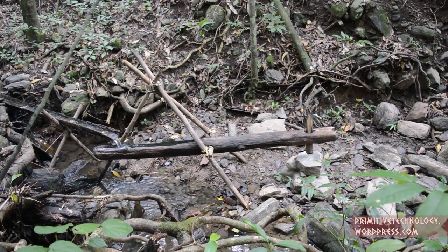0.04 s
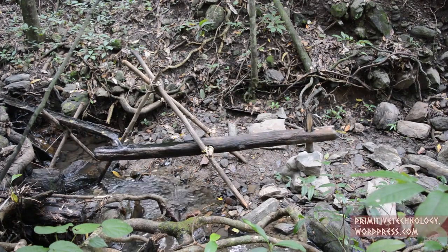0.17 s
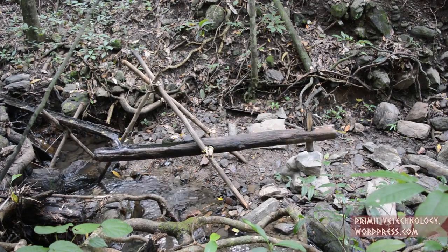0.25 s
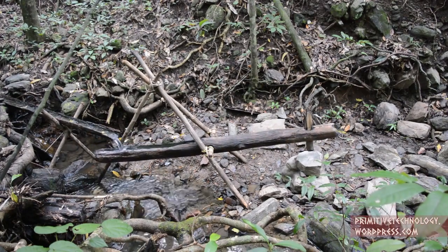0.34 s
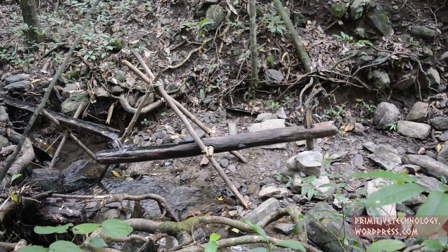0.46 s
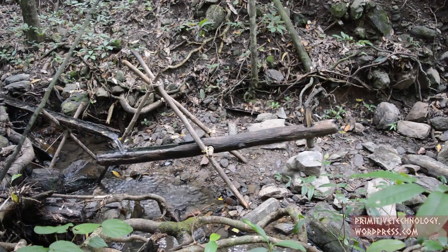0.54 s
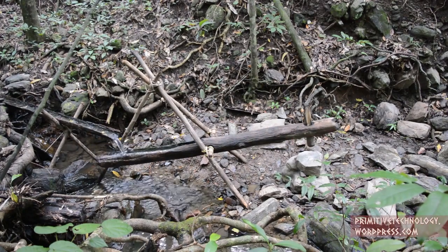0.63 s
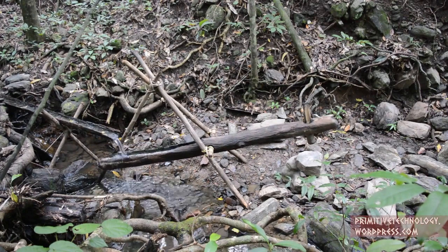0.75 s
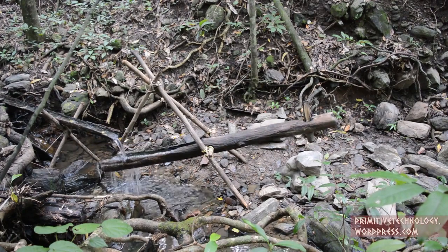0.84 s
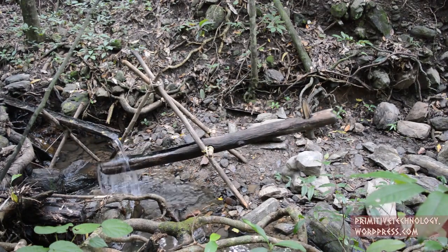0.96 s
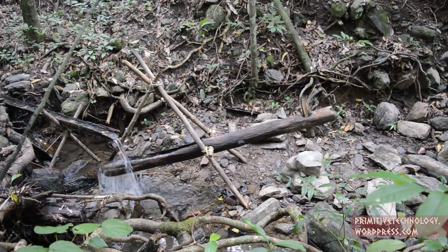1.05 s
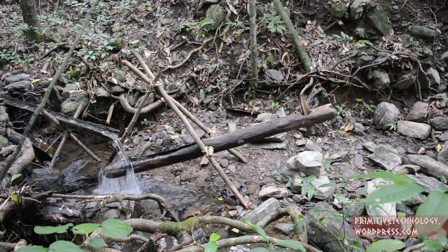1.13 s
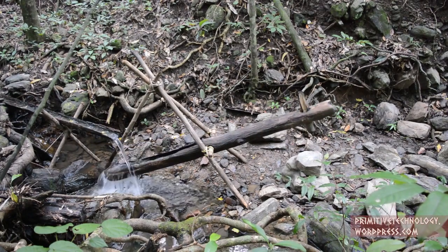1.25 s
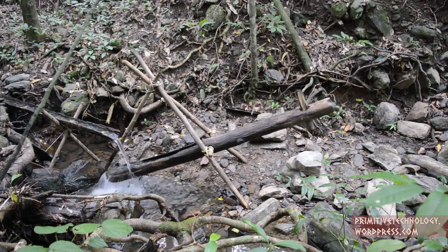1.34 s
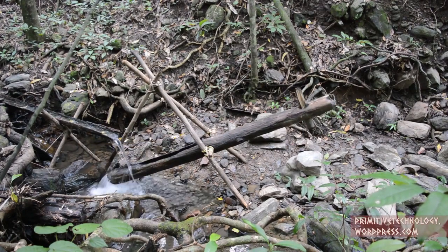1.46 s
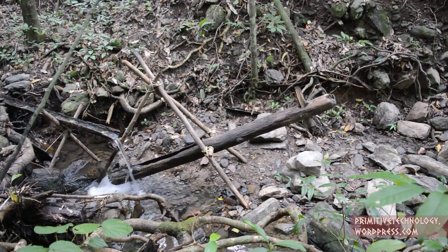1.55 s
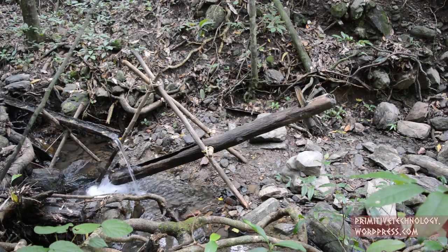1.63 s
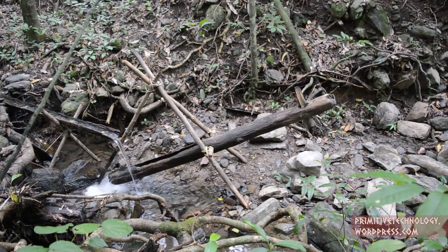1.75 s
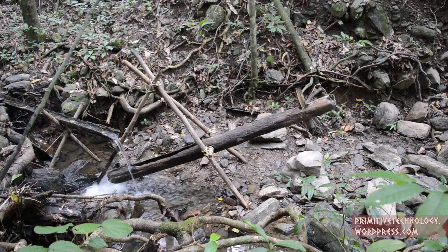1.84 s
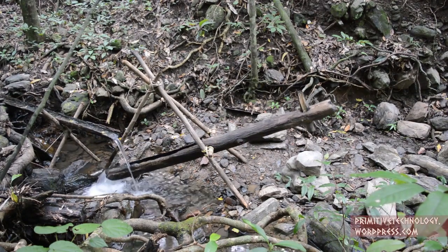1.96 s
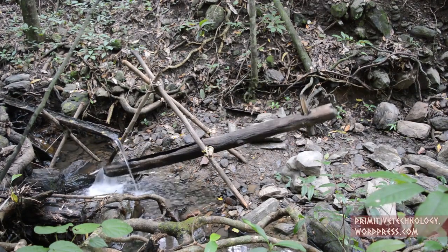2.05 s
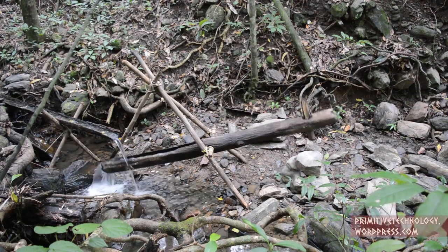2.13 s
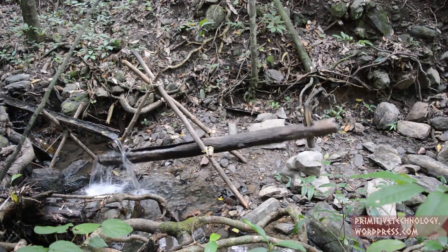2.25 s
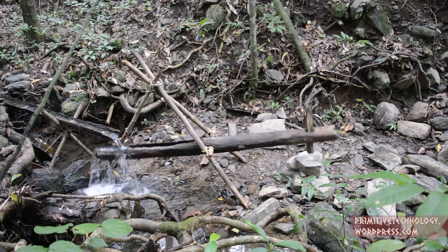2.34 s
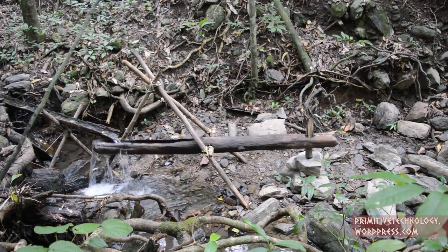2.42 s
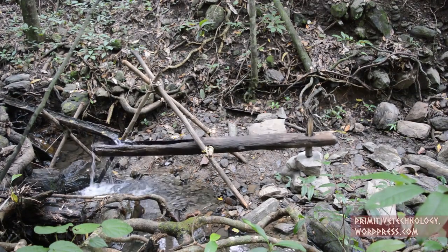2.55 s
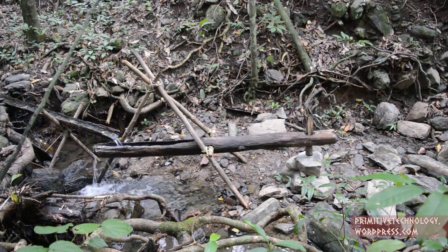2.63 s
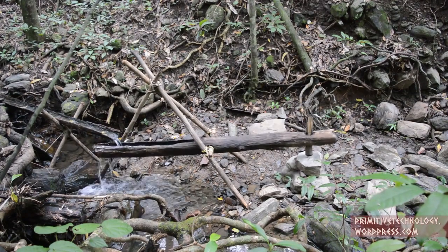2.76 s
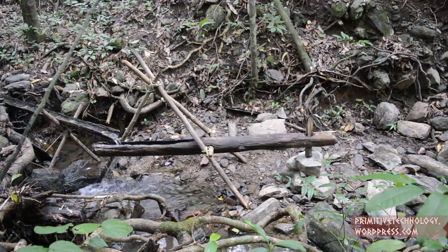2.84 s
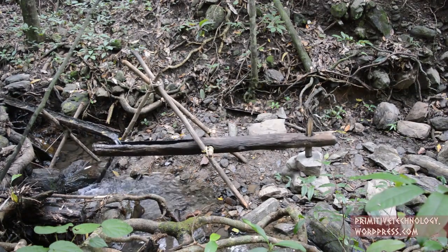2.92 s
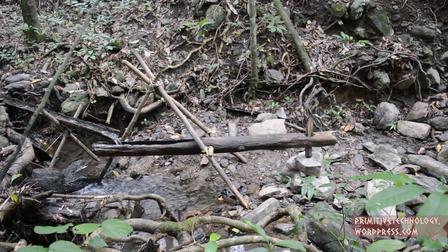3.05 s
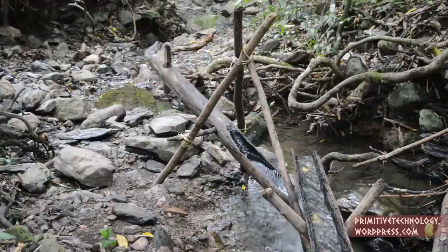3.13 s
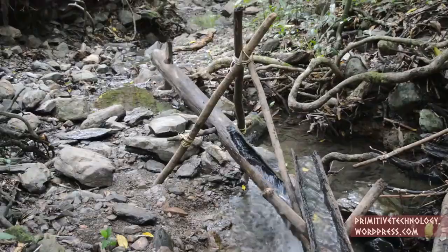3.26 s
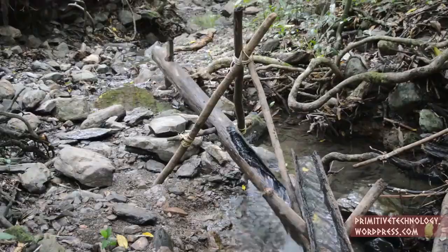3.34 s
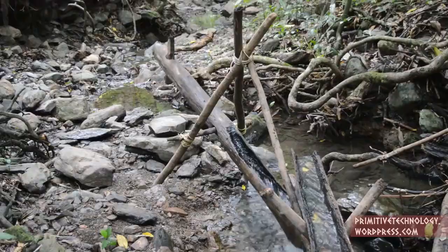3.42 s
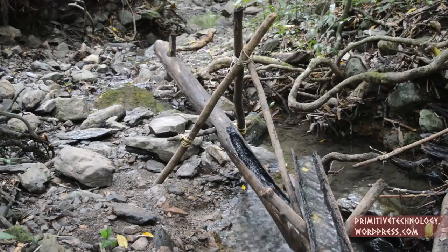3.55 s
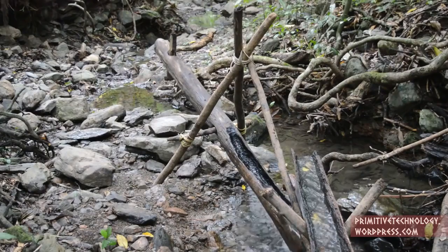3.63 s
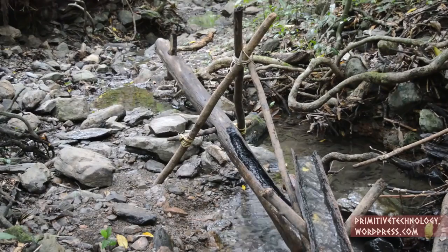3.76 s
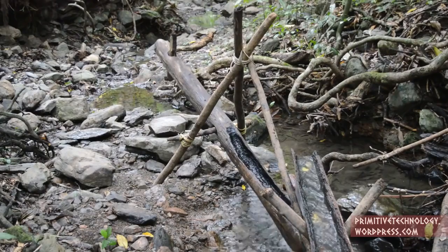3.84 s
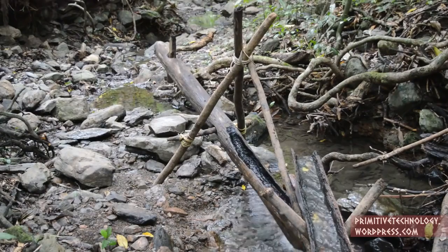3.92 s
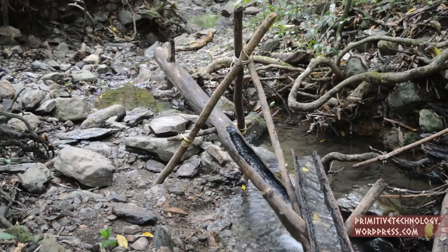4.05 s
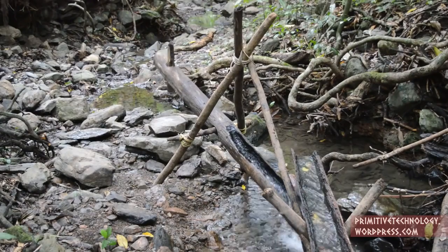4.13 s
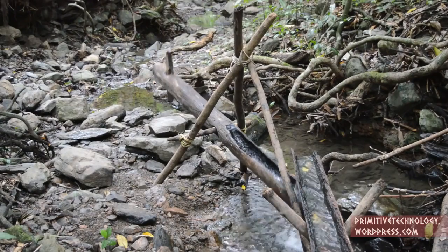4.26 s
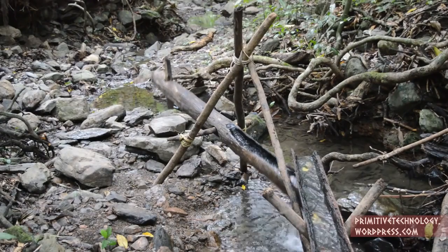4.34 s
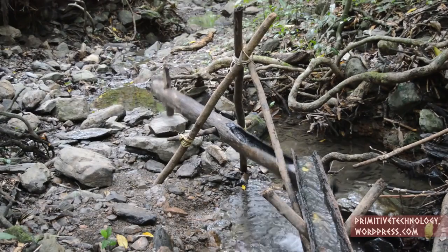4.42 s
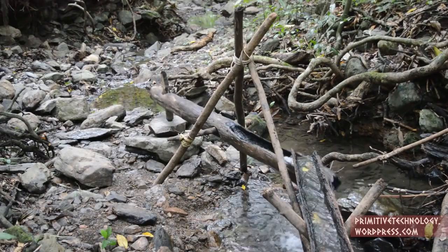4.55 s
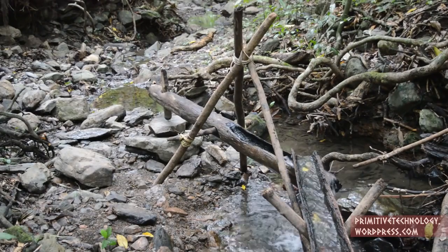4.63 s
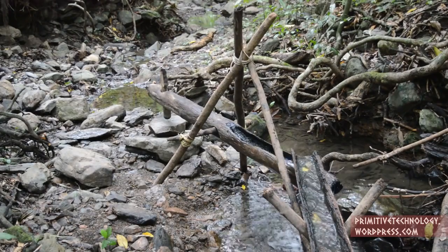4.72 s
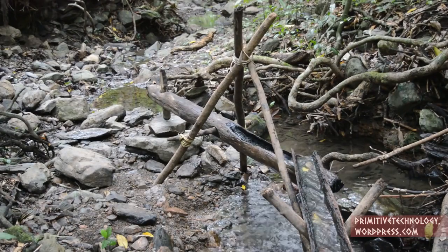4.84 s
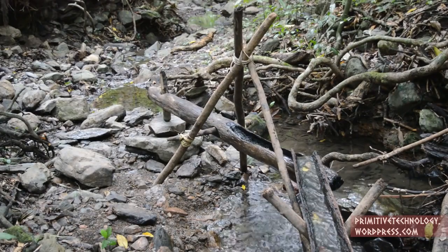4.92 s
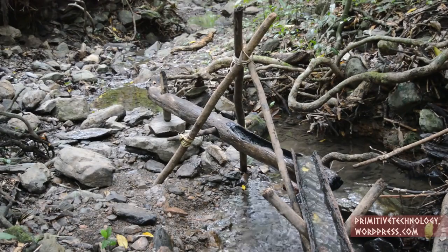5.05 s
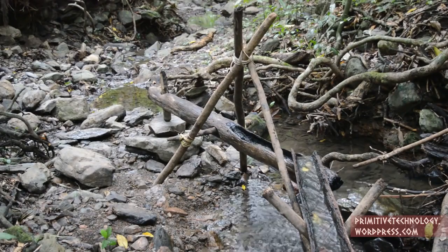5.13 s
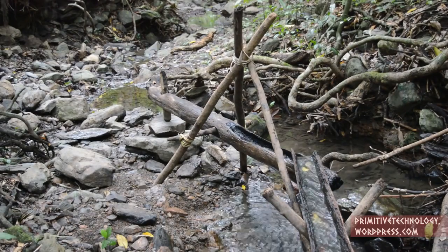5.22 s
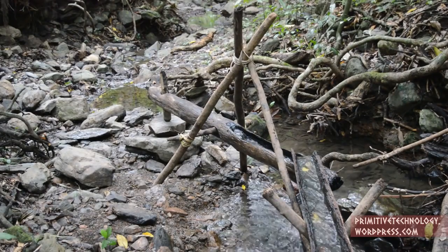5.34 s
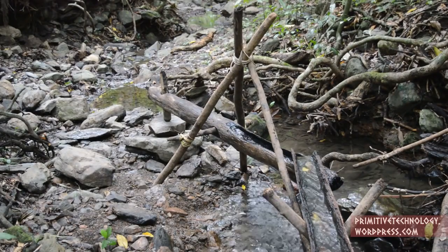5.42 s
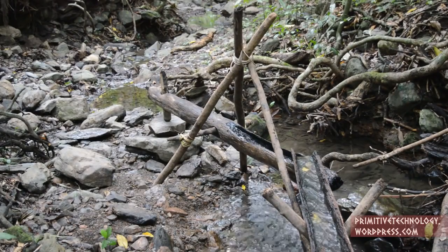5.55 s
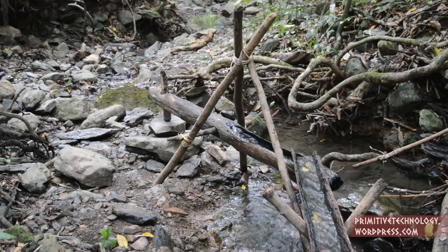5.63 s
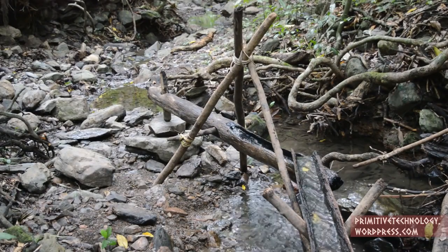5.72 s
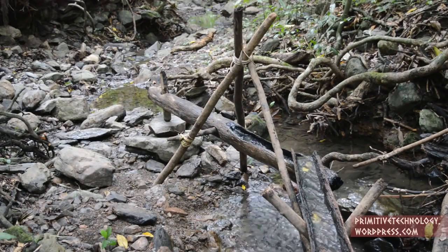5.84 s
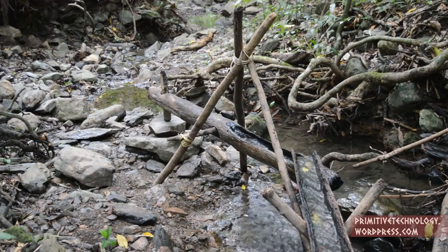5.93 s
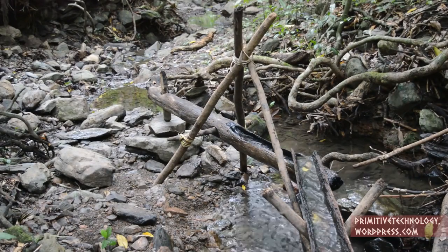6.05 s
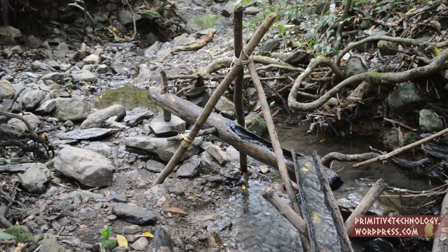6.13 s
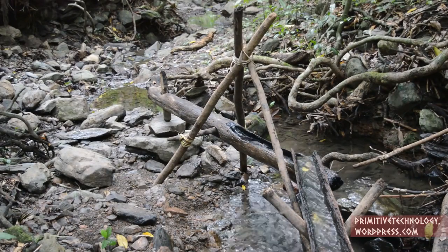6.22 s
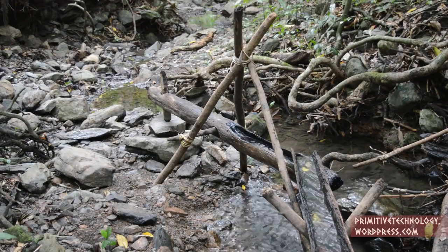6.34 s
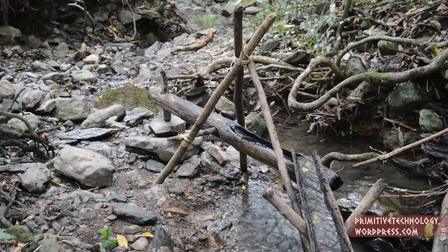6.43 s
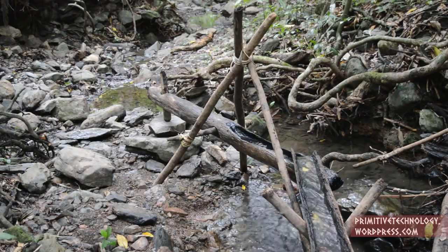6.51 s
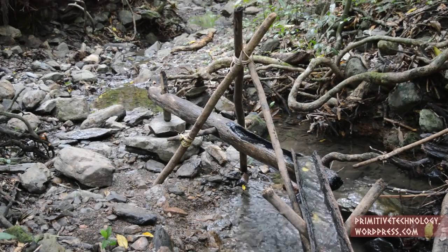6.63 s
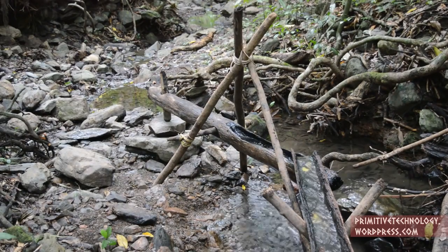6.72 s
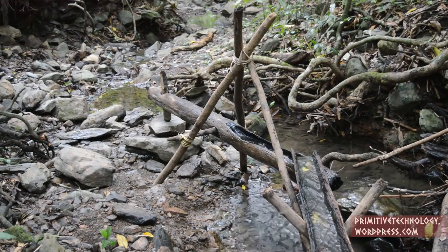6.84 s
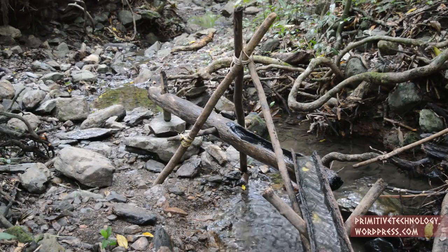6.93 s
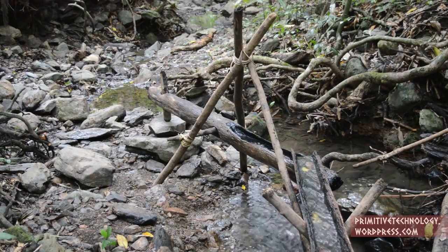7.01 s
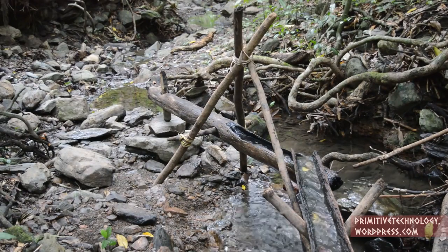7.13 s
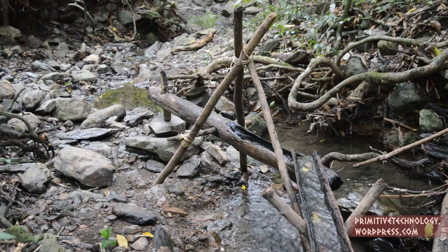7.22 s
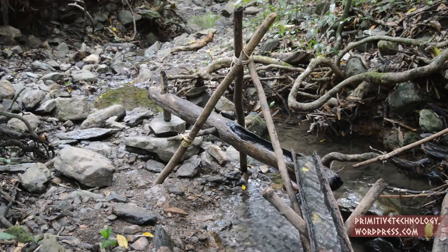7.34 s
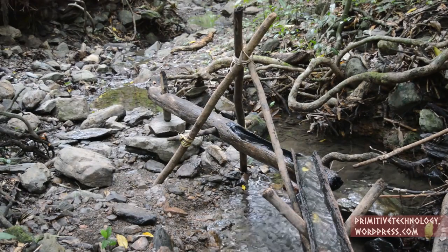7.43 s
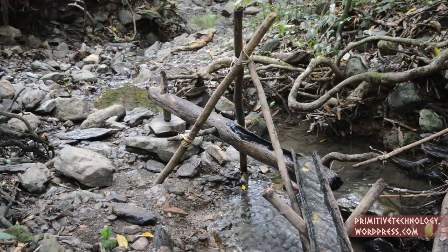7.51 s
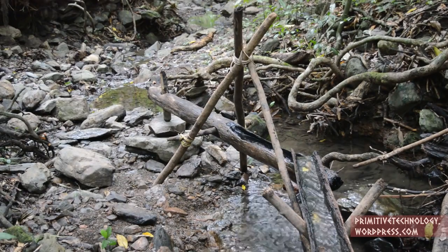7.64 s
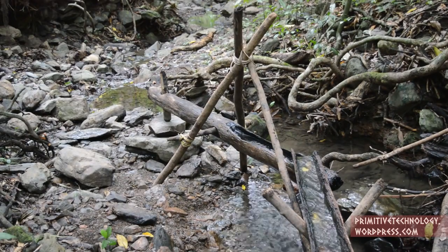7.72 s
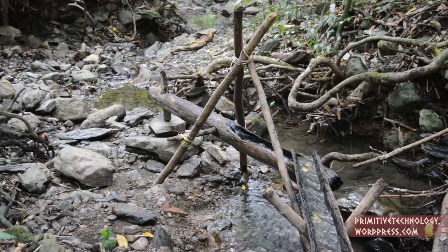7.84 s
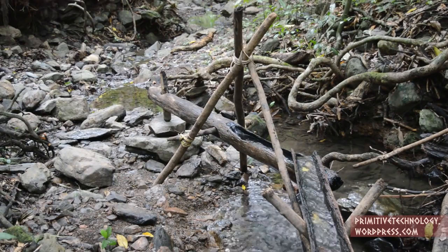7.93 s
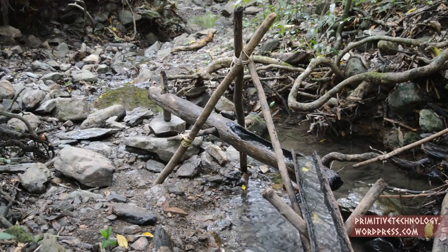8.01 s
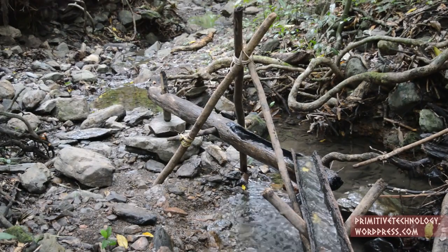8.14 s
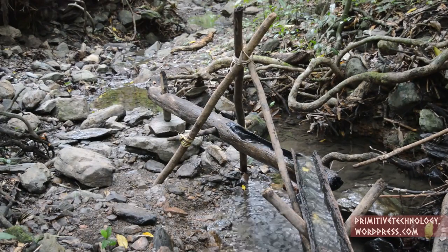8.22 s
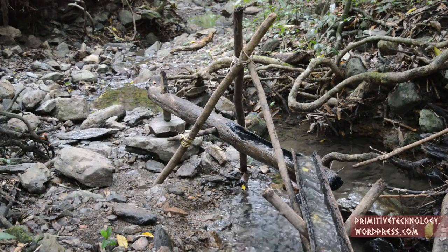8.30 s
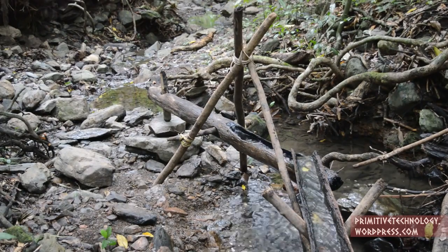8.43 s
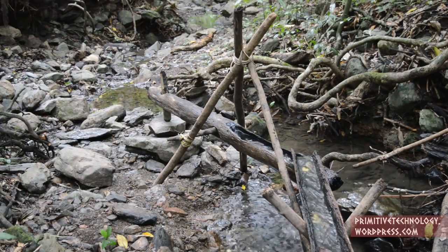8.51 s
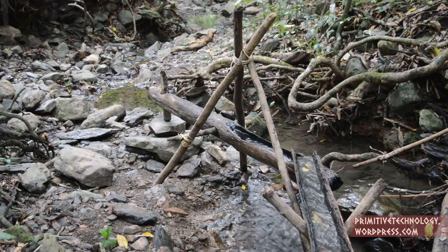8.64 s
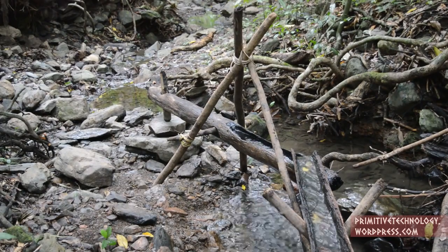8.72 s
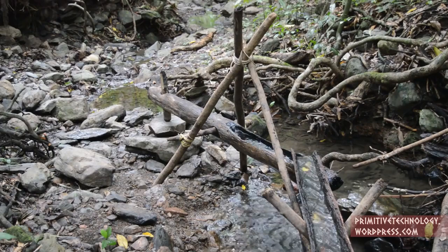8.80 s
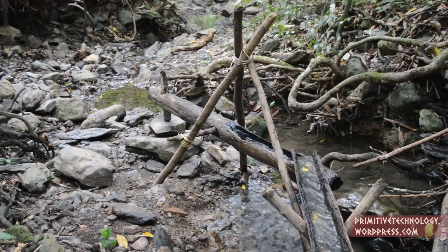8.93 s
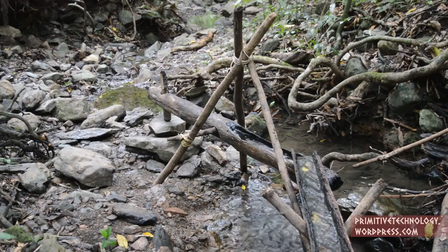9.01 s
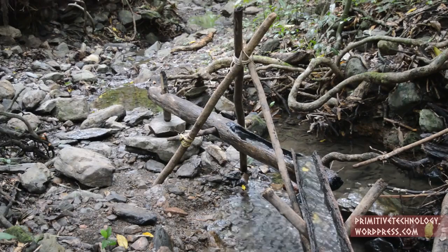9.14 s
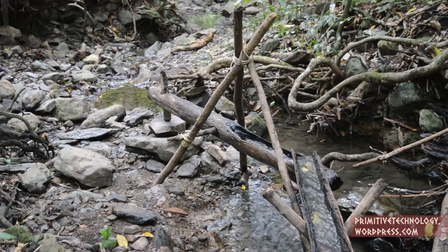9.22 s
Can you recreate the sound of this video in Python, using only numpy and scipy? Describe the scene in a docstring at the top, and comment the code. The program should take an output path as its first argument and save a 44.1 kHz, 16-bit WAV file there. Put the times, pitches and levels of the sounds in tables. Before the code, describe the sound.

In a forest creek, a pivoted log trough spills water with a splashy rush, then knocks hard on stone, twice, before quiet trickling and dripping.

```python
"""A water-driven hammer, a pivoted log, in a forest creek: over hissing, bubbling water its trough end spills
with a rush near 1.2 s, and at 2.5 s its wooden head knocks on a stone and bounces. From 3.24 s, heard from
a second place, it spills and knocks again (4.6 s); then water trickles with drips and bubbles. Far insects
buzz, loudest around 5 s. Water is noise, clicks and short ringing tones; each knock pushes many ringing
parts of the log and adds thuds and a crack. Both channels carry the same sound, as from one microphone."""
import sys
import numpy as np
from scipy import signal
from scipy.io import wavfile
from scipy.ndimage import uniform_filter1d

SR = 44100
rng = np.random.default_rng(int(sys.argv[2]) if len(sys.argv) > 2 else 0)


def digitize_waveform(pressure):
    """Quantize a signal to 16-bit integers and store it at the path in sys.argv[1].

    Rows of a 2-D input are taken as channels; values are limited to [-1, 1].
    """
    field = np.atleast_2d(pressure).T
    bounded = np.clip(field, -1, 1)
    quanta = np.round(bounded * 32767).astype(np.int16)
    wavfile.write(sys.argv[1], SR, quanta)


N = 408807
MOVE_S = 3.24   # the listener changes place
MID_FLOW_DB = -35   # middling water flow, to which churning and droplets are compared


def amp(db):
    """Turn decibels into a gain factor."""
    return 10 ** (np.asarray(db) / 20)


def rms_one(x):
    """Scale a sound to an average (rms) strength of 1."""
    return x / np.sqrt(np.mean(x ** 2) + 1e-20)


def in_time(rows):
    """Draw straight lines between the times of a table, giving one curve for each further column."""
    s, *columns = np.transpose(rows)
    return [np.interp(np.arange(N) / SR, s, column) for column in columns]


def at_hz(points, hz):
    """Read a level from a spectrum table, in between its points on a log-frequency axis."""
    table_hz, table_db = np.transpose(points)
    return np.interp(np.log(hz), np.log(table_hz), table_db)


def drift(rate_hz):
    """Wander slowly and at random around 0 with a spread of 1: smoothed noise."""
    r = np.exp(-80 * np.pi * rate_hz / SR)
    # computed at every 40th sample only; the first 2000 values let the filter settle
    slow = signal.lfilter([1], [1, -2 * r, r * r], rng.standard_normal(N // 40 + 2002))[2000:]
    return np.interp(np.arange(N) / 40, np.arange(len(slow)), rms_one(slow))


def ring(x, hz, t60):
    """Ring like a struck object: a unit click starts a sine of height 1 that falls 60 dB in t60 seconds."""
    r = amp(-60 / (t60 * SR))
    w = 2 * np.pi * hz / SR
    return signal.lfilter([0, np.sin(w)], [1, -2 * r * np.cos(w), r * r], x + 1e-18)


def band(x, hz, width_hz):
    """Keep only the frequencies around a centre."""
    edges = np.clip([hz - width_hz / 2, hz + width_hz / 2], 10, .45 * SR)
    return signal.sosfilt(signal.butter(2, edges, "band", fs=SR, output="sos"), x)


def low_pass(x, top_hz):
    """Weaken the frequencies above top_hz."""
    return signal.sosfilt(signal.butter(2, top_hz, fs=SR, output="sos"), x)


def fade(length, t60):
    """Die away steadily, by 60 dB in t60 seconds."""
    return amp(-60 * np.arange(length) / SR / t60)


def add(out, s, sound):
    """Mix a sound in at time s."""
    i = round(s * SR)
    out[i:i + len(sound)] += sound[:N - i]


def grains(per_s, spread_db):
    """Scatter clicks at random, most of them small and a few large."""
    sizes = amp(spread_db * np.minimum(rng.exponential(1, N), 5))
    return sizes * (rng.random(N) < per_s / SR)


def hiss(spectrum, centres, swell, own_db):
    """Add up third-octave bands of noise that wander by own_db; swell(k) is the gain in time of band k."""
    white = rng.standard_normal((2, N))
    total = np.zeros(N)
    for k, hz in enumerate(centres):
        gain = amp(at_hz(spectrum, hz) + own_db * drift(14)) * swell(k)
        total += gain * band(white[k % 2], hz, .23 * hz)   # neighbours use different noise
    return rms_one(total)


def swarm(spectrum, level_db, per_s, cycles, spread_db, count):
    """Clumped bubbles each ring for some cycles at one of many pitches; a higher level brings more of them."""
    crowd = amp(.8 * (level_db - level_db.min()))
    clumped_per_s = per_s * crowd * amp(3.0 * drift(8))
    clicks = grains(clumped_per_s, spread_db) * rng.choice([-1, 1], N)
    clicks /= np.sqrt(crowd)   # the crowd alone adds no power: level_db sets it below
    pitches = np.geomspace(spectrum[0][0], spectrum[-1][0], count)
    dealt = rng.integers(0, count, N)   # which pitch each click sets ringing
    rings = np.zeros(N)
    for k, hz in enumerate(pitches):
        tone = rms_one(ring(clicks * (dealt == k), hz, cycles / hz))
        rings += amp(at_hz(spectrum, hz)) * np.sqrt(hz) * tone
    return amp(level_db) * rms_one(rings)


def creek():
    """The creek further off is steady noise over a wide range of pitch."""
    # colour of the creek: (frequency [Hz], relative level per Hz [dB])
    creek_spectrum = [(25, -7.5), (70, 6), (130, -0.5), (400, -2), (1000, -6), (2000, -9), (3500, -13),
                      (6500, -26), (10000, -27), (16000, -22)]
    centres = 25 * 2 ** (np.arange(29) / 3)
    return amp(-53.5) * hiss(creek_spectrum, centres, lambda k: 1, own_db=.8)


def water_flow():
    """The strength of the falling water in dB, moment by moment, is its level as heard in the spray."""
    # level of the falling water: (time [s], level [dB])
    flow = [(0, -45), (.5, -40), (.8, -39.5), (.95, -35), (1.08, -26), (1.37, -25), (1.57, -28),
            (2.22, -33), (2.5, -30.5), (2.66, -34), (3.12, -37.5), (3.24, -40.5), (3.4, -27.5), (3.55, -28),
            (3.95, -33), (4.31, -34.5), (4.55, -31.5), (4.72, -34), (5.5, -44), (9.27, -45.5)]
    return in_time(flow)[0]


def splashes(per_s, spread_db, t60):
    """Power of random drops, each starting at once and dying away, kept near 1 over each second."""
    power = signal.lfilter([1], [1, -amp(-120 / (t60 * SR))], grains(per_s, spread_db) ** 2 + 1e-18)
    return power / (uniform_filter1d(power, SR) + 1e-9)


def spray(level_db, smooth=0.61, wide=0.063):
    """Fine spray is smooth noise; bigger drops burst over all or part of the treble, more often in strong flow."""
    # colour of the spray: (frequency [Hz], relative level per Hz [dB])
    spray_spectrum = [(1800, -3.5), (2200, -2), (3000, -0.5), (4000, -3.5), (6100, 2), (8800, -8.5),
                      (12000, -21), (16000, -43)]
    busy = amp(.3 * (level_db + 45))
    everywhere = splashes(30 * busy, 0.62, 0.028)
    parts = [splashes(60 * busy, 2.2, 0.05) for _ in range(4)]
    # smooth and wide are shares of the power; the rest belongs to the four parts
    gains = [np.sqrt(smooth + wide * everywhere + (1 - smooth - wide) * part) for part in parts]
    # the second place is 3 dB duller above about 8 kHz
    gains[3] = gains[3] * np.where(np.arange(N) > MOVE_S * SR, amp(-3), 1)
    centres = 1800 * 2 ** (np.arange(10) / 3)
    noise = hiss(spray_spectrum, centres, lambda k: gains[min(k * 3 // 7, 3)], own_db=1.0)
    return amp(level_db) * noise


def churning(spray_db):
    """Churning bubbles ring in a crowd that follows the flow with a lag and is nearer at the second place."""
    # colour of the churning: (frequency [Hz], relative level per Hz [dB])
    churn_spectrum = [(450, -16), (870, -8), (1270, -5), (1700, -7.5), (2300, -25)]
    lag_s = 0.052
    mid_db, db_per_flow_db, nearer_db = -43.5, 1.2, 4   # mid_db: level at middling flow, first place
    r = np.exp(-1 / (lag_s * SR))
    lagged_db = signal.lfilter([1 - r], [1, -r], spray_db - spray_db[0]) + spray_db[0]
    level_db = mid_db + db_per_flow_db * (lagged_db - MID_FLOW_DB)
    level_db += nearer_db * (np.arange(N) > MOVE_S * SR)
    return swarm(churn_spectrum, level_db, per_s=300, cycles=46.0, spread_db=2.0, count=24)


def gulping():
    """Low bubbles gulp in a crowd that swells around each spill and settles slowly."""
    # colour of the gulps: (frequency [Hz], relative level per Hz [dB])
    gulp_spectrum = [(120, -13), (190, 2.5), (270, -3), (340, 3), (550, -9)]
    # each spill stirs the pool: (time of strongest gulping [s], level [dB])
    stirs = [(1.55, -42.5), (3.58, -42.5)]
    rise_db_per_s, fall_db_per_s, calm_db = 65, 12, -61.5
    t = np.arange(N) / SR
    swells = [db - np.maximum(rise_db_per_s * (s - t), fall_db_per_s * (t - s)) for s, db in stirs]
    level_db = np.maximum(calm_db, np.max(swells, axis=0))
    return swarm(gulp_spectrum, level_db, per_s=80, cycles=14, spread_db=1.5, count=12)


def smack(hz, t60, noise):
    """A drop gives a sharp tick, a short noise burst around its pitch and a broader splash; peak 1."""
    length = noise.shape[1]
    tick = band(noise[1] * fade(length, 0.0055), 1.13 * hz, 0.98 * hz)
    core = band(noise[0] * fade(length, t60), hz, 0.22 * hz)
    splash = band(noise[1] * fade(length, 0.21), 5600, 5300)
    drop = amp(-4.0) * tick + core + amp(-16) * splash
    return drop / np.abs(drop).max()


def smacks(spray_db, count):
    """Clear drops smack on wood, stone or water, among random droplets whose loudness follows the spray."""
    # the clearest drops: (time [s], peak level before the treble cut [dB], centre frequency [Hz])
    clear_drops = [(0.03, -32, 4370), (0.1131, -28, 4500), (0.2029, -30, 4330), (0.2957, -29, 6930),
                   (0.387, -20, 3460), (0.4189, -23, 4390), (0.4454, -25, 3370), (0.5073, -22, 3230),
                   (0.5742, -25, 5440), (0.5945, -36, 4400), (0.6977, -27, 3000), (0.9273, -19.5, 5500),
                   (1.0068, -16, 2870), (1.0475, -17, 2730), (1.1373, -13, 5900), (1.216, -9, 6060),
                   (2.3501, -17, 6200), (2.7496, -17, 6350), (2.8052, -18, 6200), (2.919, -16.5, 5800),
                   (3.025, -14, 5800), (3.1774, -18, 4140), (3.5868, -10, 3300), (5.0414, -13.5, 6000),
                   (5.0856, -17, 5530), (5.145, -20.5, 3900), (5.2917, -22, 5760), (5.478, -23.5, 3000),
                   (5.5566, -17, 4050), (5.9314, -26, 4730), (6.2694, -27.5, 2810), (6.5733, -16.5, 4060),
                   (6.7403, -23, 5700), (6.977, -25, 6130), (7.0638, -25.5, 5950), (7.1427, -20, 6000),
                   (7.1624, -25, 3470), (7.5832, -17.5, 6400), (7.9106, -26, 7010), (8.433, -28, 3300),
                   (8.5021, -27, 5550), (8.7145, -24.5, 5990)]
    db_per_flow_db = 0.83
    out, length = np.zeros(N), SR // 8
    for s, db, hz in clear_drops:
        add(out, s, amp(db) * smack(hz, 0.034, rng.standard_normal((2, length))))
    for when, size, loud in rng.random((count, 3)):
        level_db = MID_FLOW_DB + db_per_flow_db * (spray_db[int(when * N)] - MID_FLOW_DB)
        level_db += 5.0 + 11 * loud - 7 * size ** 2   # high-pitched droplets are fainter
        droplet = smack(2600 * 3.98 ** size, 0.011, rng.standard_normal((2, length)))
        add(out, when * N / SR, amp(level_db) * droplet)
    return low_pass(out, 9700)


def bubble(hz, t60, rise, plop):
    """A dying sine glides in pitch while its loudness wobbles at random; the drop lands with a brief plop."""
    t = np.arange(len(plop)) / SR
    # rise is the glide per second as a share of hz; hz itself is reached early on
    turns = hz * (t + rise * (t ** 2 - t * t60 * .3) / 2)
    loudness = np.abs(plop)
    wobble = 1 + .9 * uniform_filter1d(loudness - loudness.mean(), size=200) * 4
    soft_start = 1 - np.exp(-t * hz / 1.0)
    swing = wobble * np.sin(2 * np.pi * turns) * fade(len(t), max(t60, .01)) * soft_start
    return swing + amp(-4) * plop * fade(len(t), 0.009)


def bubbles(count):
    """Trapped air rings: the clearest bubbles, and many fainter random ones in clusters of four."""
    # from big air pockets in the pool to small ones under drips: (time [s], approximate peak [dB], pitch [Hz])
    clear_bubbles = [(0.35, -36, 700), (0.371, -29.5, 1200), (0.419, -29, 1810), (0.422, -35, 894),
                     (0.455, -25.5, 1190), (0.526, -32, 1850), (0.556, -27, 1600), (0.603, -31, 1880),
                     (0.804, -34, 1155), (1.075, -30.5, 798), (1.185, -26.5, 1150), (1.336, -34, 415),
                     (1.404, -31, 363), (1.541, -36, 380), (1.583, -29, 196), (2.74, -28.5, 961),
                     (2.875, -32, 1390), (3.018, -32.5, 825), (3.075, -29, 842), (3.141, -35, 612),
                     (3.614, -32, 204), (3.659, -27.5, 189), (3.827, -34, 205), (4.003, -37, 190),
                     (4.202, -32.5, 477), (4.533, -28.5, 1480), (5.085, -26.5, 845), (5.111, -26, 1190),
                     (5.16, -27.5, 800), (5.199, -31, 1183), (5.294, -32, 1056), (5.351, -29.5, 1370),
                     (5.478, -31, 1550), (5.493, -28.5, 1145), (5.61, -35.5, 1096), (5.753, -34, 1410),
                     (5.772, -27, 1430), (5.785, -38, 860), (5.831, -43, 854), (6.04, -41, 796),
                     (6.13, -39, 1370), (6.151, -42, 760), (6.192, -35, 1003), (6.436, -32, 1570),
                     (6.489, -33.5, 1430), (6.613, -35, 1830), (6.893, -39.5, 1110), (6.98, -38, 1820),
                     (7.055, -31.5, 1515), (7.464, -28, 927), (7.743, -36, 1410), (7.773, -35.5, 982),
                     (7.803, -36.5, 740), (8.099, -30.5, 1050), (8.153, -35, 620), (8.185, -31, 1235),
                     (8.22, -34, 2130), (8.298, -34, 1460), (8.321, -34, 840), (8.383, -36, 973),
                     (8.405, -38, 742), (8.403, -34, 1080), (8.435, -31.5, 1440), (8.574, -31.5, 996),
                     (8.622, -36.5, 670), (8.904, -33, 1670), (9.002, -33, 1216), (9.067, -35.5, 1030)]
    t60_at_1khz = 0.0866   # seconds; big, low bubbles ring longer
    rise_per_s = 3.5   # mean upward glide as a share of the pitch, from 1 kHz up; lower ones glide less
    out, length = np.zeros(N), SR // 5
    plops = rms_one(band(rng.standard_normal((len(clear_bubbles), length)), 1820, 2400))
    trails = rng.random((len(clear_bubbles), 3, 3))
    for (s, db, hz), plop, trail in zip(clear_bubbles, plops, trails):
        khz = hz / 1000
        rise = rise_per_s * min(khz, 1) * 4 * trail[0, 0] ** 3   # a random few glide much more than the rest
        sound = bubble(hz, t60_at_1khz / np.sqrt(khz), rise, plop * min(khz, 1) ** 2)
        add(out, s, amp(db) * sound)
        for late, size, glide in trail[1:]:   # bubbles, mostly smaller, break away after it
            small_hz = hz * (0.95 + 0.716 * size)
            small = bubble(small_hz, 55 / small_hz, 14 * glide, 0 * plop)
            add(out, s + .015 + .05 * late, amp(db - 11) * small)
    for k, (when, *draws) in enumerate(rng.random((count, 17))):
        for late, size, loud, glide in np.reshape(draws, (4, 4)):
            hz = 700 * 2.8 ** size
            sound = bubble(hz, 60 / hz, 20 * glide ** 2 - 3, plops[k % len(plops)])
            add(out, when * (N / SR - .1) + .08 * late, amp(-53 + 10.7 * loud) * sound)
    return out


def contacts():
    """Every fall is followed by quick rebounds and one late soft bounce: (s, six part levels dB, contact ms)."""
    # the head falls on the stone: (time [s], late bounce after it [s], strength of rebounds [dB], of bounce [dB],
    # then as heard from each place: bending, trough, beam, head, crack, ground thump [dB])
    falls = [(2.5156, .4384, -1.5, -2, -29, -21.5, -15.5, 1, 1, -7),
             (4.5707, .4529, 0.5, -1, -18.5, -12, -11, 0.5, -8.5, -13)]
    # quick rebounds: (time after the fall [s], then relative to the fall:
    # bending, trough, beam, head, crack, thump [dB]; contact [ms])
    rebounds = [(0.0712, 4.5, -2, -10, -17, -45, -8.5, 0.39), (.088, -41, -1.5, -19, -19.5, -45, -20, 0.59),
                (.119, -3, -14, -21.5, -22, -49, -23, .25)]
    # late soft bounce, relative to the fall: (bending, trough, beam, head, crack, thump [dB]; contact [ms])
    *bounce_parts_db, bounce_ms = (-8, -2.5, -5.5, -22, -37, -6, 1.54)
    fall_ms = .22
    rows = []
    for s, bounce_s, rebound_db, bounce_db, *parts_db in falls:
        rows.append((s, *parts_db, fall_ms))
        rows.append((s + bounce_s, *(np.add(parts_db, bounce_parts_db) + bounce_db), bounce_ms))
        for late, *less_db, ms in rebounds:
            rows.append((s + late, *(np.add(parts_db, less_db) + rebound_db), ms))
    return sorted(rows)


def ring_modes(push, modes):
    """Let one push ring a list of (dB, Hz, t60) modes, neighbours swinging in opposite sense."""
    return sum((-1) ** k * amp(db) * ring(push, hz, t60) for k, (db, hz, t60) in enumerate(modes))


def hammer():
    """Each contact smoothly pushes the modes of every part, plus a thump, a noisy thud and a wood-on-stone crack."""
    # ringing modes of each part of the log: (frequency [Hz], relative level [dB], 60 dB decay time [s])
    bending = [(80, -13, 0.24), (205, -2, 0.67)]
    trough = [(382, -2.5, 0.17), (417, -2.9, 0.12)]
    beam = [(527, 2.4, .22)]
    head = [(757, -8.5, 0.056), (906, 4, 0.034), (1000, 5.5, 0.0089), (1116, -8, 0.074),
            (1265, -7.5, 0.055), (1670, -13.5, 0.032), (2420, -30, .025)]
    # dull noise of fibres, lashings and ground: (frequency [Hz], level relative to the head [dB], decay time [s])
    thud = [(135, -28, 0.066), (322, -18.5, 0.078), (705, -16, 0.21), (1030, -16.5, 0.12),
            (1680, -4.5, 0.018)]
    # stone resonances: (frequency [Hz], width [Hz], relative level [dB])
    stone = [(1760, 2700, -16), (3380, 280, 1), (5700, 2800, -2), (7960, 1900, -8.5), (12500, 3700, -17)]
    pressed_t60_s = .045   # each new contact stops what trough, beam and head still ring with
    out, length, rows = np.zeros(N), SR, contacts()
    t = np.arange(length) / SR
    next_times = [row[0] for row in rows[1:]] + [np.inf]
    for row, then in zip(rows, next_times):
        s, bending_db, trough_db, beam_db, head_db, crack_db, thump_db, contact_ms = row
        push = np.zeros(length)
        shape = np.hanning(round(contact_ms * SR / 500))   # contact_ms is its width at half height
        push[:len(shape)] = -shape / shape.sum()
        parts = [(trough_db, trough), (beam_db, beam), (head_db, head)]
        struck = [(part_db + db, hz, t60) for part_db, modes in parts for hz, db, t60 in modes]
        wood = ring_modes(push, struck)
        wood *= amp(-60 * np.maximum(t - (then - s), 0) / pressed_t60_s)
        wood += ring_modes(push, [(bending_db + db, hz, t60) for hz, db, t60 in bending])
        noise = rng.standard_normal((2, length))
        for hz, db, t60 in thud:
            wood += amp(head_db + db) * rms_one(band(noise[0], hz, 0.38 * hz)) * fade(length, t60)
        wood *= 1 - np.exp(-t / 0.0019)   # the blow needs a moment to spread through the log
        wood += amp(thump_db) * ring(push, 190, 0.018)
        crack = sum(amp(db) * band(noise[1], hz, width) for hz, width, db in stone)
        if s > MOVE_S:
            crack = low_pass(crack, 8500)   # duller at the second place
        add(out, s, wood)
        add(out, s + .0011, amp(crack_db) * rms_one(crack) * fade(length, 0.016))
    return out


def scatter(x):
    """Rocks and trunks return diffuse echoes: a noise tail with its own decay in each band."""
    # echoes: (frequency [Hz], level [dB], 60 dB decay time [s])
    echoes = [(2000, -59, 0.07), (3470, -46, 0.11), (7040, -46, 0.14)]
    length = SR // 2
    tail = np.zeros(length)
    for hz, db, t60 in echoes:
        noise = band(rng.standard_normal(length), hz, 0.77 * hz)
        tail += amp(db) * rms_one(noise) * fade(length, t60)
    delay = np.zeros(round(0.0037 * SR))
    return signal.fftconvolve(x, np.concatenate([delay, tail]))[:N]


def insects():
    """Many far insects blur into narrow bands of noise that throb a little."""
    # chorus levels: (time [s], low band level [dB], high band level [dB])
    chorus = [(0, -78, -63), (3.2, -56, -55), (4.7, -57, -42), (5.2, -53, -44.5), (5.9, -50.5, -45.5),
              (6.3, -50.5, -53), (9.27, -50, -67)]
    # the low and the high band: (frequency [Hz], width [Hz])
    chorus_bands = [(2250, 280), (6600, 420)]
    total = np.zeros(N)
    for db, (hz, width) in zip(in_time(chorus), chorus_bands):
        buzz = rms_one(band(rng.standard_normal(N), hz, width))
        total += amp(db + 1.1 * drift(8.9)) * buzz
    return total


def scene():
    """All sources are mixed into one channel, sent to both ears."""
    spray_db = water_flow()
    water = spray(spray_db) + churning(spray_db) + gulping()
    drips = smacks(spray_db, count=420) + bubbles(count=190)
    knock = hammer()
    near = water + drips + knock + scatter(knock)
    # deep bass below about 84 Hz is weakened in the near sounds
    near = signal.sosfilt(signal.butter(3, 84, "high", fs=SR, output="sos"), near)
    mono = near + creek() + insects()
    return np.array([mono, mono])


def record(dry):
    """Peaks too loud for the input are cut off flat, then everything above 16 kHz is removed."""
    clipped = np.clip(dry, -1, 1)
    return signal.sosfilt(signal.ellip(12, .3, 95, 16000, fs=SR, output="sos"), clipped)


dry = scene()
out = record(dry)
digitize_waveform(out)
```